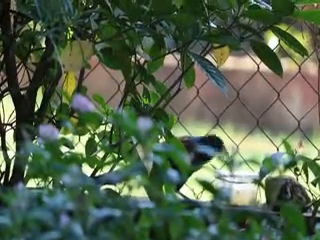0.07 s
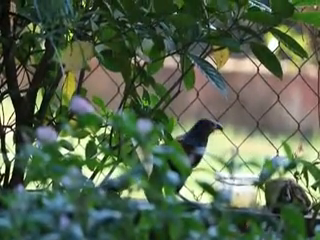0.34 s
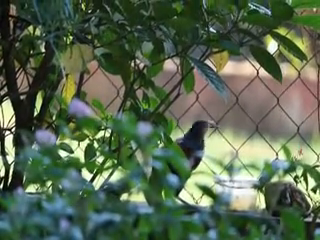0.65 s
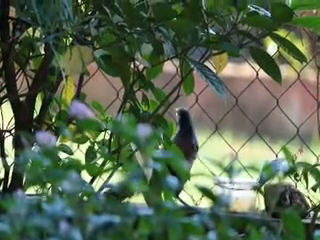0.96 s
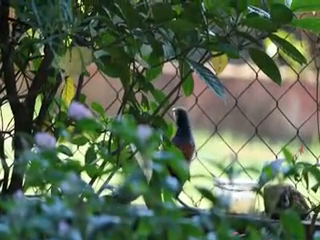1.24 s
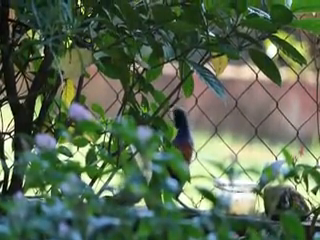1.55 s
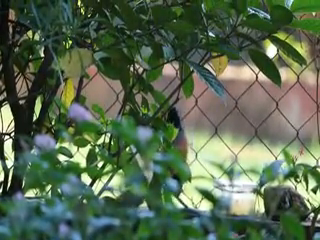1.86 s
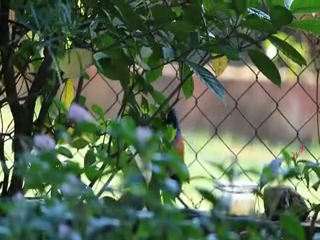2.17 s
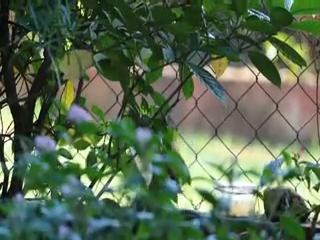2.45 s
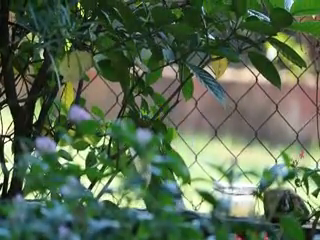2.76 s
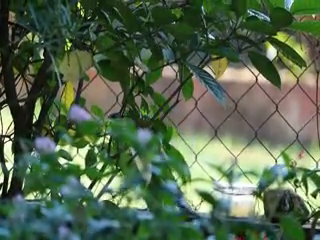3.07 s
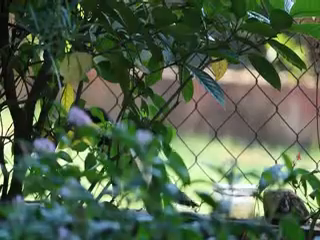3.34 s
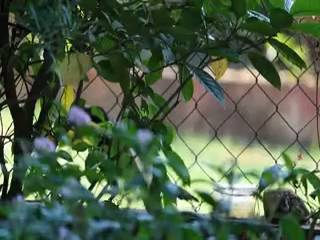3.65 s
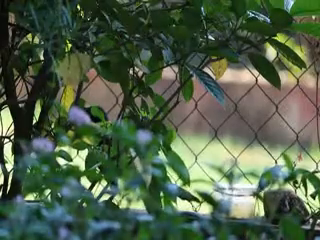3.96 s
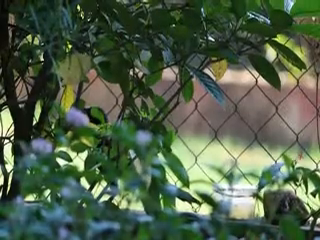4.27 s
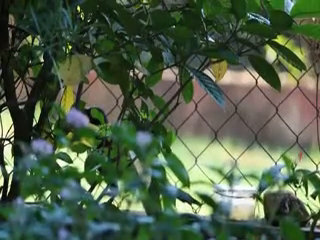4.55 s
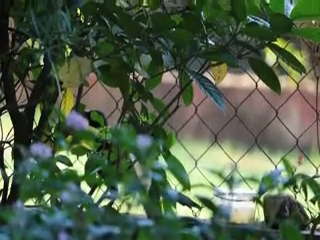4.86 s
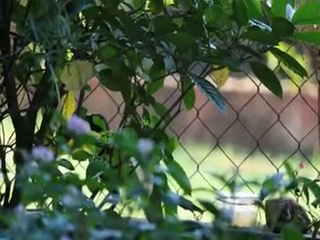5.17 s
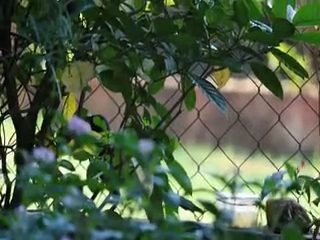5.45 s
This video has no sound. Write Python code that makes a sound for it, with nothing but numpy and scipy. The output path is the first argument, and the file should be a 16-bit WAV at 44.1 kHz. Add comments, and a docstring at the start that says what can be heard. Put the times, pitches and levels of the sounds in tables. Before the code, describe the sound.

A small bird chirps and whistles thinly in a garden, over camera hum and ticks, with one loud, echoing bang on a board.

```python
"""Two rising chirps from a small bird in a garden hedge, then two thin, falling whistles that linger
between the walls. Soft open air and a far engine lie underneath. Right at the microphone the camera's
lens motor hums and ticks, and fingers bump and brush the body. One hard bang on a board nearby
overloads the microphone and echoes round the yard; later a twig snaps."""
import sys
import numpy as np
from scipy import signal
from scipy.fft import rfft, irfft
from scipy.io import wavfile
from scipy.ndimage import uniform_filter1d

SR = 44100
rng = np.random.default_rng(int(sys.argv[2]) if len(sys.argv) > 2 else 0)


def master(y):
    """Save y as 16-bit WAV."""
    cut = np.clip(np.atleast_2d(y).T, -1, 1)
    pcm = np.round(cut * 32767)  # scale
    wavfile.write(sys.argv[1], SR, pcm.astype(np.int16))


N = 251811

# Levels are relative, before each source's own gains and filters.
# chirp notes in pairs, one from each side of the syrinx: start_s, length_s, first_hz, top_hz, level_db
CHIRP_NOTES = [(0, .11, 4590, 5280, -37), (.035, .095, 5220, 6460, -40), (.228, .11, 4300, 4960, -39.5),
               (0.304, .06, 5400, 6210, -41.5)]
# whistles: start_s, length_s, first_hz, held_hz, drop_hz, level_db, accent_at_s
WHISTLE_NOTES = [(1.165, .5, 6630, 5937, 29.8, -46, 1.313), (3.75, .675, 6390, 5880, 300, -43.5, 4.285)]
# decay among the nearby leaves: frequency_hz, t60_s
LEAF_DECAY = [(3000, 0.6), (10000, 0.37)]
# open air: frequency_hz, density_db
AIR_SPECTRUM = [(20, -7.5), (50, -10), (90, -2.5), (170, 1.5), (300, -3.5), (520, -4), (720, -9.5),
                (1050, -13.5), (2200, -17.5), (4700, -22.5), (6500, -25), (7600, -25), (9800, -34.5),
                (15000, -46)]
# the far engine's swells: start_s, length_s, level_db
ENGINE_SWELLS = [(-.1, .28, -55.5), (.3, 0.3, -54), (1.4, .83, -55.5)]
# the lens motor's harmonics: multiple, level_db
MOTOR_HARMONICS = [(4, -64.5), (6, -62), (7, -67.5), (9, -67), (14, -65.5), (16, -57.5), (19, -66),
                   (21, -68.5), (26, -88)]
# the lens barrel's resonances: centre_hz, width_hz, level_db
BARREL_RESONANCES = [(859, 71, -62), (1331, 293, -56.5), (2550, 180, -66), (2740, 330, -60),
                     (3209, 150, -54), (3342, 360, -54), (3816, 115, -60.5), (3953, 96, -65),
                     (4200, 370, -63.5), (5240, 350, -68)]
# focus steps: start_s, level_db
FOCUS_STEPS = [(0.0926, -30.5), (0.1336, -31.5), (0.2846, -33.5), (0.3324, -32), (0.4883, -31.5),
               (1.0938, -35), (1.4194, -35.5), (2.536, -35.5), (2.642, -34.5), (2.7233, -35.5),
               (3.397, -36.5), (3.746, -36)]
# a click on the camera: frequency_hz, level_db
CLICK_SPECTRUM = [(100, -8), (900, -21), (1800, -3), (2400, 7), (3300, 5), (4500, -7), (6200, 4),
                  (8000, -15), (10000, -20), (12500, -37), (16000, -42)]
# contacts of the blow on the board: start_s, level_db
BOARD_CONTACTS = [(2.3733, 1.5), (2.3746, 1), (2.3762, -2.5)]
# the board's modes: pitch_hz, level_db, t60_s
BOARD_MODES = [(197, -21.5, 0.062), (298, -13, 0.057), (498, -6.5, 0.042), (616, -13, 0.023),
               (918, -4, 0.025), (1080, -9, 0.014), (1180, -16, 0.02), (1440, -19.5, 0.032),
               (1735, -23.5, 0.043), (2030, -10.5, 0.015), (2260, -11, 0.011), (3284, -9.5, 0.0089),
               (4020, -15, 0.013), (5860, -29, .008)]
# how the short blow drives the board: frequency_hz, gain_db
BLOW_DRIVE = [(30, -25), (120, -42.5), (190, -2), (400, 1), (3000, 0.5), (7000, -11), (10000, -30),
              (15000, -24)]
# the bang's echoes: frequency_hz, density_db
BANG_ECHO_SPECTRUM = [(50, -42), (115, -22), (180, -2.5), (500, -2), (900, -2), (1400, -3.5), (2300, -5.5),
                      (3500, -17.5), (4800, -22.5), (6000, -33), (9000, -40), (11500, -56), (15000, -62)]
# decay round the yard: frequency_hz, t60_s
YARD_DECAY = [(200, 1), (700, 1), (2000, 0.72), (5000, 1), (12000, .35)]
# skin brushing the camera: start_s, length_s, hiss_db, rumble_db
SKIN_BRUSHES = [(2.56, 0.1, -47, -35.5), (2.848, 0.026, -51, -62), (4.628, .1, -49, -62)]
# the skin's hiss and the body's rumble: frequency_hz, density_db
SKIN_HISS = [(300, -18), (2000, 10.5), (5000, 7), (7500, 4), (10000, -9), (12000, -19), (15000, -30)]
BODY_RUMBLE = [(60, -28), (130, -4), (220, 3), (500, -4), (900, -9), (1500, -34), (6000, -55)]
# fingers bumping the camera: start_s, thud_db, pitch_factor, click_db
FINGER_BUMPS = [(2.5815, -3.5, 0.72, -46), (2.6098, -7.5, 1.67, -41), (4.743, 4, 0.97, -19),
                (4.7446, -2, 0.88, -21)]
# the camera body's thud: frequency_hz, gain_db
BODY_THUD = [(30, -17), (80, -12), (140, 9.5), (270, 24), (480, 15.5), (700, -4.5), (900, 11), (1400, 2),
             (2500, -10), (6000, -21), (15000, -47)]
# the twig's breaking fibres: start_s, level_db
FIBRE_BREAKS = [(4.1738, -39), (4.1753, -29.5), (4.1772, -38), (4.1785, -26.5)]
# the twig's modes: pitch_hz, level_db, t60_s
TWIG_MODES = [(950, -6, 0.026), (1550, -23, .012), (2460, 5, 0.015), (2860, 4.5, 0.013), (3930, -4, .008),
              (4440, -20, .01), (6050, -5.5, 0.0089), (7460, -27, .006), (9500, -32, .005)]
# how the fibres drive the twig: frequency_hz, gain_db
FIBRE_DRIVE = [(50, -5), (500, -4.5), (7500, 4), (10500, -7), (13000, -20), (16000, -28)]


def amp(db):
    return 10 ** (np.asarray(db) / 20)


def unit(x):
    return x / np.sqrt(np.mean(x ** 2) + 1e-20)


def curve_at(points, hz):
    """Joins (Hz, value) points on a log-frequency axis."""
    f, value = np.transpose(points)
    return np.interp(np.log(hz + 1), np.log(f + 1), value)


def seconds(length):
    return np.arange(int(length * SR)) / SR


def add(mix, start_s, sound):
    part = mix[max(round(start_s * SR), 0):][:len(sound)]
    part += sound[:len(part)]


def noise(spectrum, size):
    """Noise of rms 1 with the given colour."""
    gain = amp(curve_at(spectrum, np.fft.rfftfreq(size, 1 / SR)))
    return unit(irfft(rfft(rng.standard_normal(size)) * gain, size))


def band(hz, width_hz):
    """Noise of rms 1 in one steep resonance."""
    detuning = (np.fft.rfftfreq(N, 1 / SR) - hz) / (width_hz / 2)
    return unit(irfft(rfft(rng.standard_normal(N)) / (1 + detuning ** 4) ** .5, N))


def wander(rate_hz):
    """Random drift of rms 1, up to about the given rate."""
    f = np.fft.rfftfreq(N, 1 / SR)
    return unit(irfft(rfft(rng.standard_normal(N)) * np.exp(-(f / rate_hz) ** 2), N))


def colour(x, spectrum, size=4096):
    """A minimum-phase filter with the given (Hz, dB) response."""
    log_gain = np.log(amp(curve_at(spectrum, abs(np.fft.fftfreq(size, 1 / SR)))))
    taps = np.fft.ifft(np.exp(np.conj(signal.hilbert(log_gain)))).real
    return signal.fftconvolve(x, taps[:size // 2])[:len(x)]


def die_away(x, t60s):
    """Fades each band at its own speed."""
    hz, age, bands = signal.stft(x, SR, nperseg=256)
    return signal.istft(bands * amp(-60 * age / curve_at(t60s, hz)[:, None]), SR, nperseg=256)[1]


def echo(t60s, delay_s):
    """A delayed, diffuse tail of energy 1."""
    tail = die_away(rng.standard_normal(SR), t60s)
    return np.r_[np.zeros(int(delay_s * SR)), tail / np.linalg.norm(tail)]


def scatter(song, direct_db, leaves_db, walls_db):
    """Song reaches the microphone straight, off nearby leaves, and later off the walls."""
    leaves = signal.fftconvolve(song, echo(LEAF_DECAY, delay_s=.002))[:N]
    walls = signal.fftconvolve(song, echo([(4000, .72), (7000, .67)], delay_s=.012))[:N]
    return amp(direct_db) * song + amp(leaves_db) * leaves + amp(walls_db) * walls


def tone(hz, db, waver, waver_hz):
    """A near-pure note whose pitch quavers."""
    pitch = hz * (1 + waver * wander(waver_hz)[:len(hz)])
    envelope = np.sqrt(2) * amp(db) * signal.windows.tukey(len(hz), .06)
    return envelope * np.sin(2 * np.pi * np.cumsum(pitch) / SR)


def chirp(length, first_hz, top_hz, db, climb_share=.72, attack_s=.0051, fade_db=-17):
    """A buzzy note that climbs, levels off and fades."""
    t = seconds(length)
    climb = np.sin(np.pi / 2 * np.minimum(t / length / climb_share, 1) ** 1.25)
    pitch = first_hz + (top_hz - first_hz) * climb
    note = tone(pitch, db + fade_db * (t / length) ** 3, waver=.013, waver_hz=260)
    return note * np.minimum(t / attack_s, 1)


def bird_chirps():
    """Overlapping notes from the hedge, reaching the microphone mostly as reflections."""
    song = np.zeros(N)
    for start, *note in CHIRP_NOTES:
        add(song, start, chirp(*note))
    return scatter(song, direct_db=-9, leaves_db=-6, walls_db=-6)


def open_air(level_db=-47, swell_db=1.2):
    """The garden's soft wash, wavering a little in level."""
    return amp(level_db + swell_db * wander(7.2)) * noise(AIR_SPECTRUM, N)


def far_engine(pitch_hz=71, waver_hz=3, idle_db=-58.5, flutter_db=2.5, ramp_s=.11, hum_db=-57):
    """Far off, an engine's low drone swells and fades under a steadier hum."""
    t = np.arange(N) / SR
    turns = np.cumsum(pitch_hz + waver_hz * wander(7.4)) / SR
    swells = sum(amp(db) * np.clip(np.minimum(t - start, start + length - t) / ramp_s, 0, 1)
                 for start, length, db in ENGINE_SWELLS)
    idle = amp(idle_db + flutter_db * wander(10))
    drone = (idle + swells) * np.sqrt(2) * np.sin(2 * np.pi * turns)
    return drone + amp(hum_db) * band(156, width_hz=14)


def lens_hum(drive_hz=202, flutter_db=2, ease_db_per_s=-.56):
    """At the microphone, the motor's fuzzy harmonics and barrel hiss flutter together and ease off."""
    flutter = amp(flutter_db * wander(69))
    harmonics = sum(amp(db) * band(k * drive_hz, width_hz=16) for k, db in MOTOR_HARMONICS)
    hiss = sum(amp(db) * band(hz, width) for hz, width, db in BARREL_RESONANCES)
    effort = amp(1.28 + ease_db_per_s * np.arange(N) / SR)
    return effort * flutter * (amp(-.6) * harmonics + amp(-1.5) * hiss)


def lens_ticks(start_hz=4450, end_hz=2870, glide_s=.0027, ring_s=.0047, click_s=.0028, click_db=-7):
    """Each focus step is a tiny click and a rattly, falling ring; the camera body dulls both."""
    t, out = seconds(.034), np.zeros(N)
    for start, db in FOCUS_STEPS:
        pitch = (end_hz + (start_hz - end_hz) * np.exp(-t / glide_s)) * rng.uniform(.93, 1.04)
        rattle = 1 + .49 * unit(uniform_filter1d(rng.standard_normal(len(t)), size=16))
        ring = rattle * np.sin(2 * np.pi * np.cumsum(pitch) / SR) * np.exp(-(t / ring_s) ** 2 / 2)
        click = colour(rng.standard_normal(len(t)) * np.exp(-t / click_s), CLICK_SPECTRUM)
        add(out, start, amp(db) * (ring + amp(click_db) * click))
    return colour(out, [(300, -4), (1100, -1), (2000, -2), (4200, -1), (5500, -3), (8000, -1),
                        (11000, -15), (15000, -23)])


def whistle(length, first_hz, held_hz, drop_hz, db, accent_after_s):
    """A thin note that swoops down as it swells, sags, is pushed louder once, and drops at the end."""
    swoop_s, sag_hz_per_s, drop_lead_s, drop_s = .094, 900, .06, .022
    attack_s, release_s, quiet_db = .13, .027, -14
    accent_db, accent_s = 5.5, .033
    t = seconds(length)
    swoop = (first_hz - held_hz) * np.exp(-(t / swoop_s) ** 3)
    drop = drop_hz * (1 + np.tanh((t - length + drop_lead_s) / drop_s)) / 2
    pitch = held_hz + swoop - sag_hz_per_s * t - drop
    quiet = np.maximum(1 - np.minimum(t / attack_s, (length - t) / release_s), 0)
    accent = np.exp(-((t - accent_after_s) / accent_s) ** 2)
    return tone(pitch, db + accent_db * accent + quiet_db * quiet, waver=.0043, waver_hz=110)


def bird_whistles():
    """From the same hedge, more direct than the chirps, lingering between the walls."""
    song = np.zeros(N)
    for start, *note, accent_at in WHISTLE_NOTES:
        add(song, start, whistle(*note, accent_at - start))
    return scatter(song, direct_db=-5.5, leaves_db=-7, walls_db=-5)


def strike(contacts, modes):
    """Each contact rings all the modes of an object."""
    t, out = seconds(.2), np.zeros(N)
    ring = sum(amp(db - 60 * t / t60) * np.sin(2 * np.pi * hz * t) for hz, db, t60 in modes)
    for start, db in contacts:
        add(out, start, amp(db) * ring)
    return out


def board_bang(board_db=1, near_db=-17.5, near_rise_s=.0003, near_fall_s=.028, yard_db=-30):
    """A board struck hard nearby; close surfaces answer at once, and the yard rings on."""
    t, last_contact = seconds(1), BOARD_CONTACTS[-1][0]
    out = amp(board_db) * colour(strike(BOARD_CONTACTS, BOARD_MODES), BLOW_DRIVE)
    near_envelope = np.exp(-t / near_fall_s) * (1 - np.exp(-t / near_rise_s))
    add(out, last_contact, amp(near_db) * near_envelope * noise(BANG_ECHO_SPECTRUM, len(t)))
    yard = die_away(noise(BANG_ECHO_SPECTRUM, len(t)), YARD_DECAY)
    add(out, last_contact + .01, amp(yard_db) * yard)
    return out


def handling(click_s=.00088, grain_db=2.5):
    """Fingers on the camera: bumps thud and click; skin catches and slips, hissing over a body rumble."""
    t, out = seconds(.05), np.zeros(N)
    for start, thud_db, pitch_factor, click_db in FINGER_BUMPS:
        thud = colour(signal.unit_impulse(len(t)), [(hz * pitch_factor, db) for hz, db in BODY_THUD])
        click = colour(rng.standard_normal(len(t)) * np.exp(-t / click_s), CLICK_SPECTRUM)
        add(out, start, amp(thud_db) * thud + amp(click_db) * click)
    slips = unit(amp(grain_db * wander(250)))
    for start, length, hiss_db, rumble_db in SKIN_BRUSHES:
        size = int(length * SR)
        rub = amp(hiss_db) * noise(SKIN_HISS, size) + amp(rumble_db) * noise(BODY_RUMBLE, size)
        add(out, start, rub * slips[int(start * SR):][:size] * np.hanning(size) ** .5)
    return out


def twig_snap():
    """Fibres break in quick succession, each ringing the twig."""
    return colour(strike(FIBRE_BREAKS, TWIG_MODES), FIBRE_DRIVE)


def scene():
    """The garden from one microphone on the camera."""
    return (bird_chirps() + open_air() + far_engine() + lens_hum() + lens_ticks()
            + bird_whistles() + board_bang() + handling() + twig_snap())[None]


def record(dry, cutoff_hz=15850):
    """The microphone input clips at full scale; then the top treble is cut."""
    lowpass = signal.firwin(511, cutoff_hz, window=("kaiser", 9), fs=SR)
    return signal.oaconvolve(np.clip(dry, -1, 1), lowpass[None], "same")


dry = scene()
out = record(dry)
master(out)
```